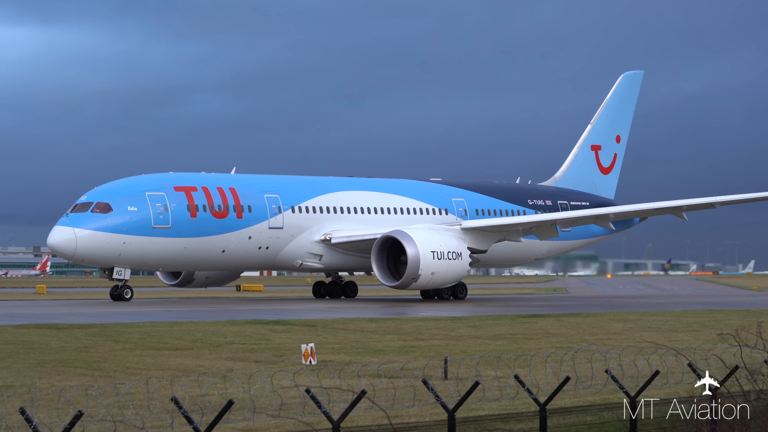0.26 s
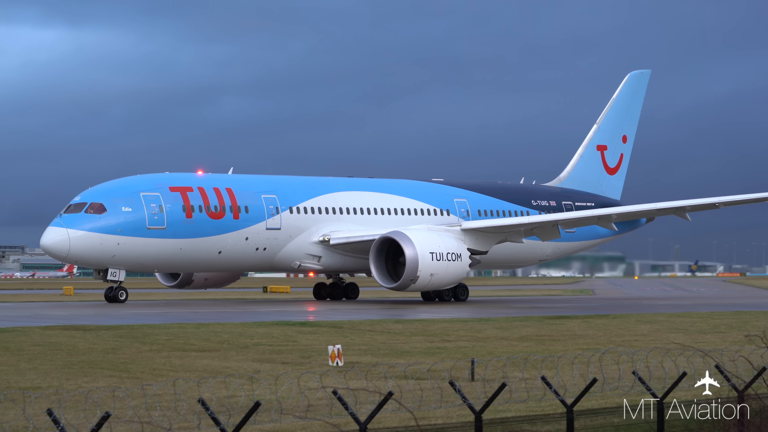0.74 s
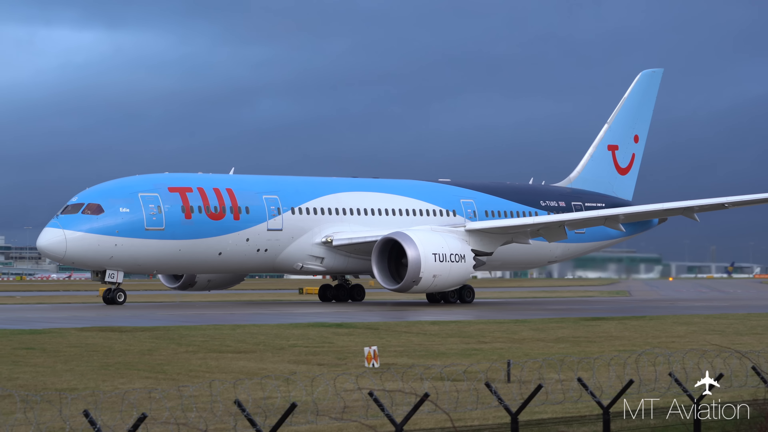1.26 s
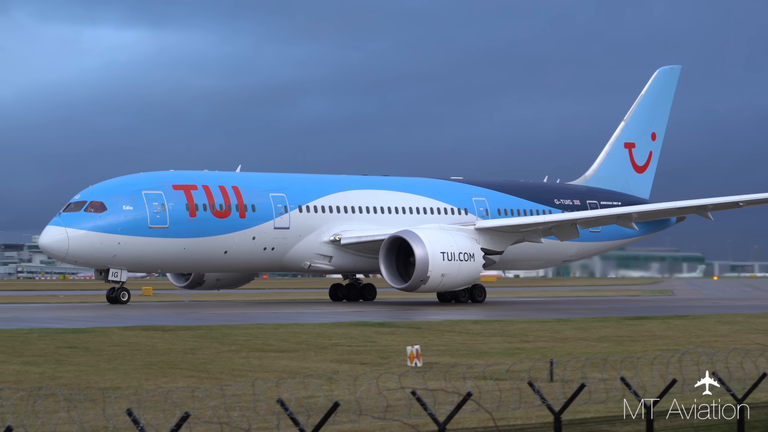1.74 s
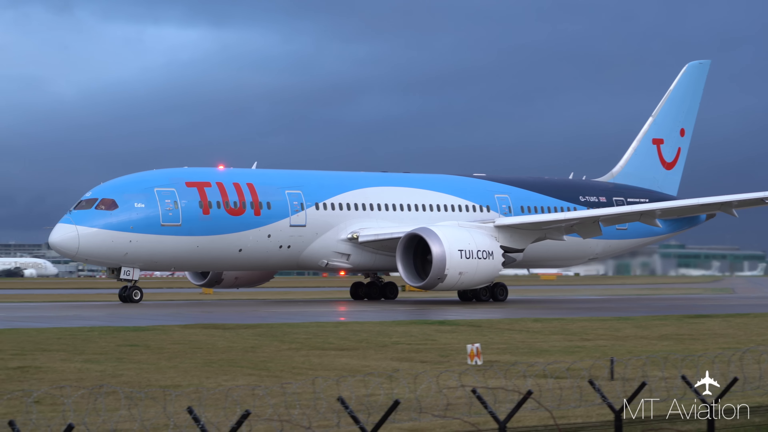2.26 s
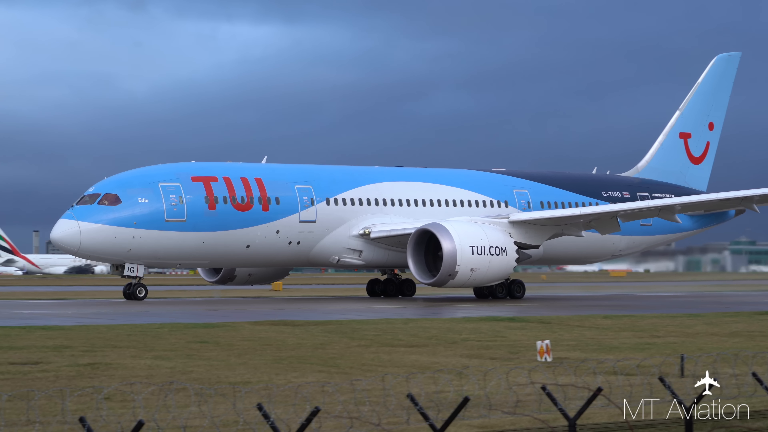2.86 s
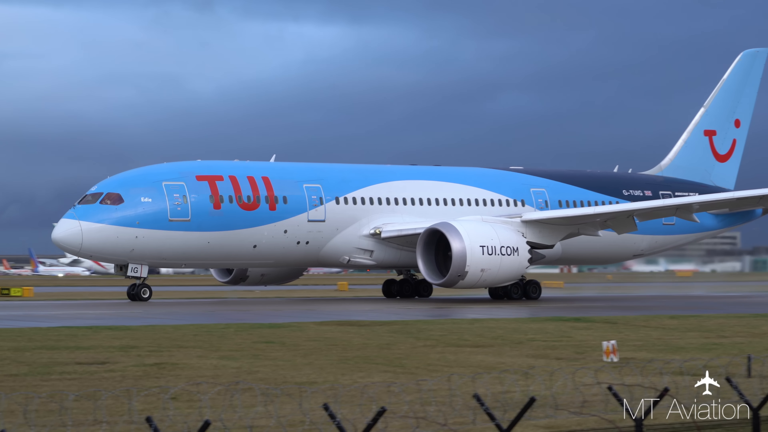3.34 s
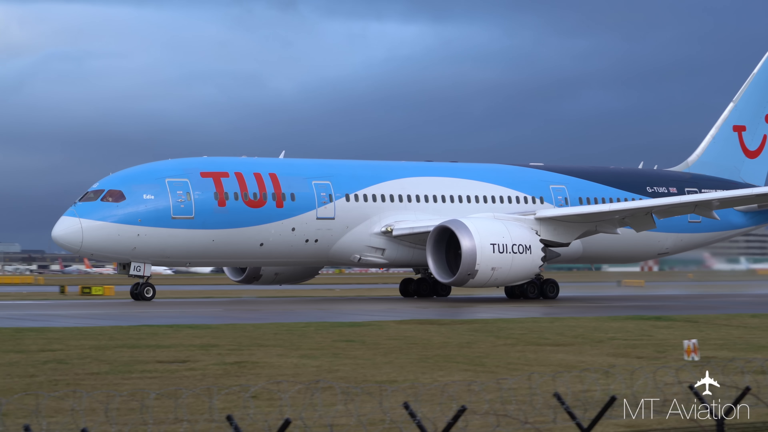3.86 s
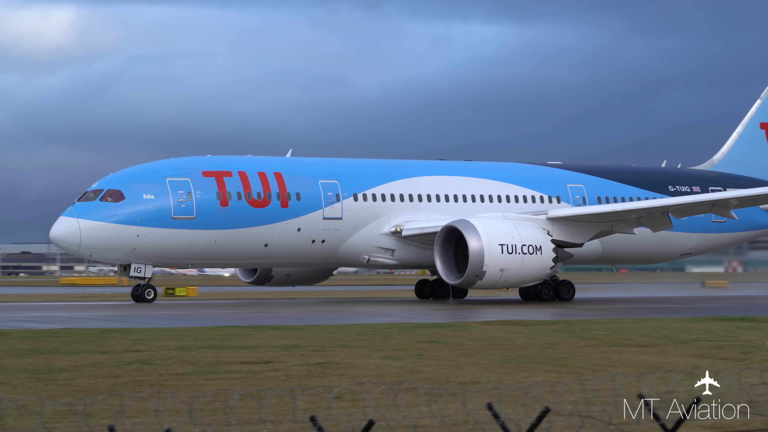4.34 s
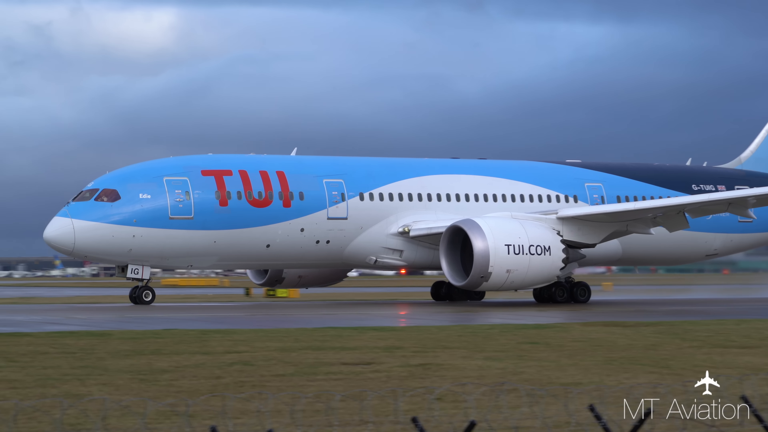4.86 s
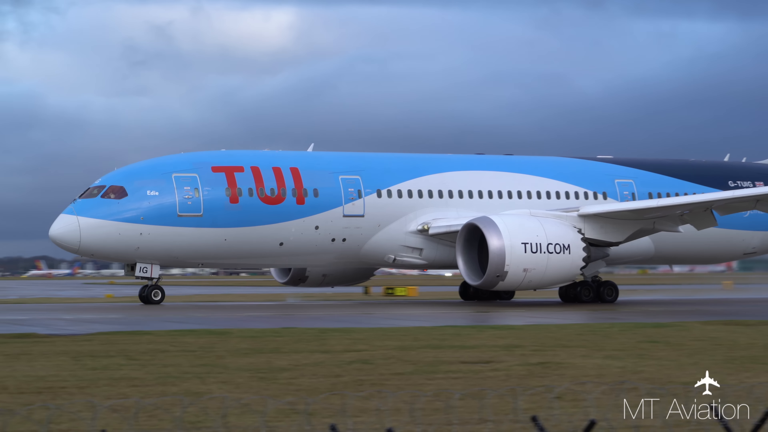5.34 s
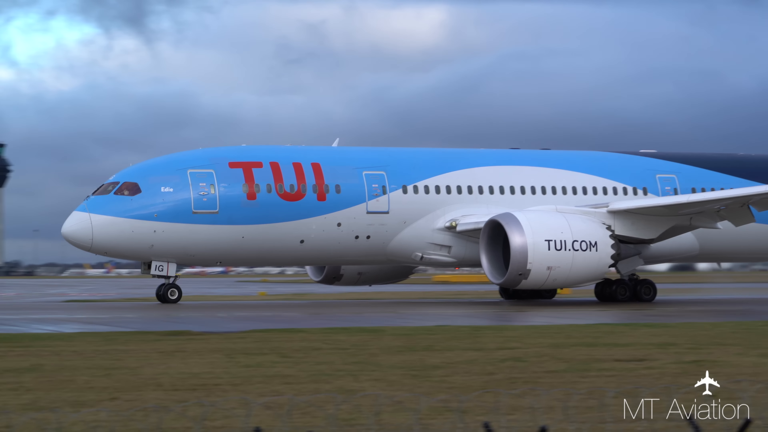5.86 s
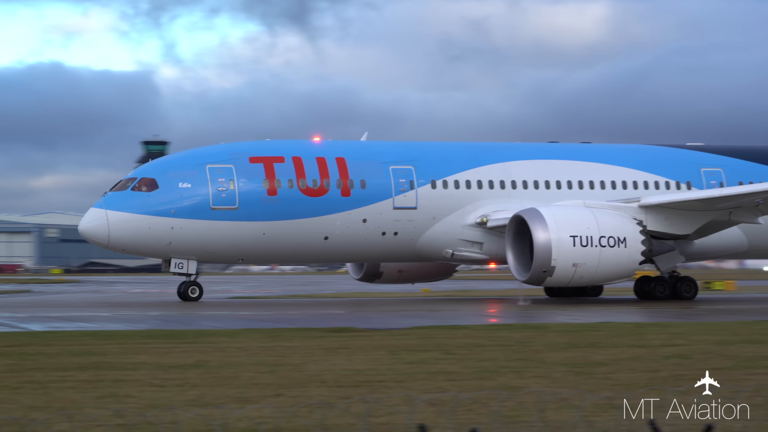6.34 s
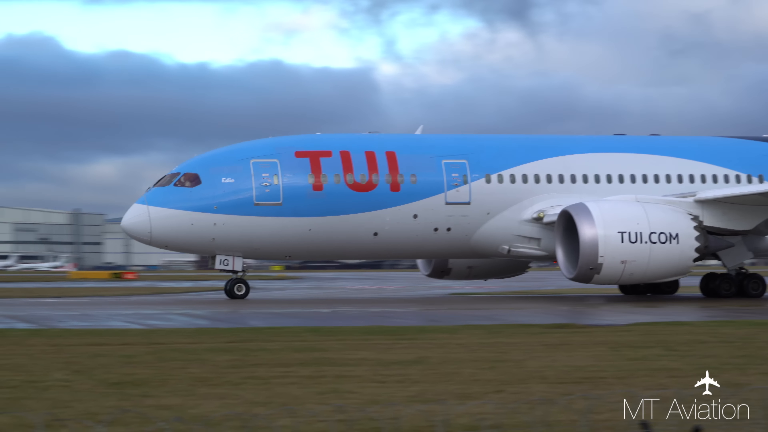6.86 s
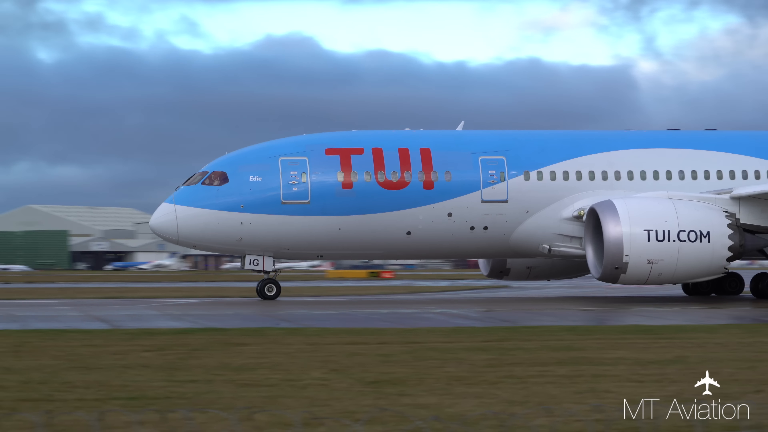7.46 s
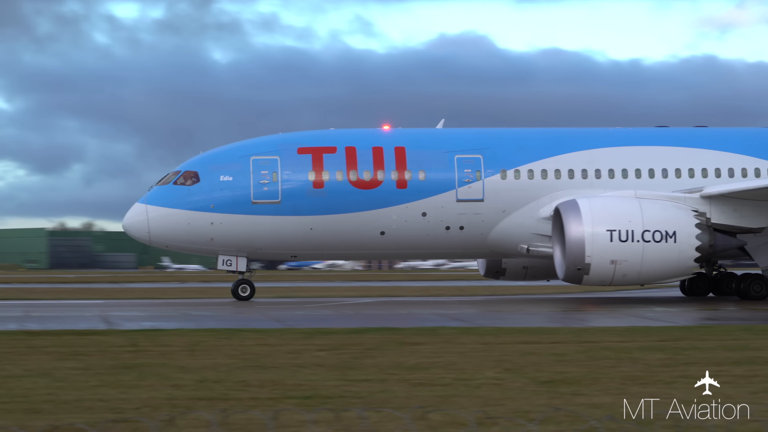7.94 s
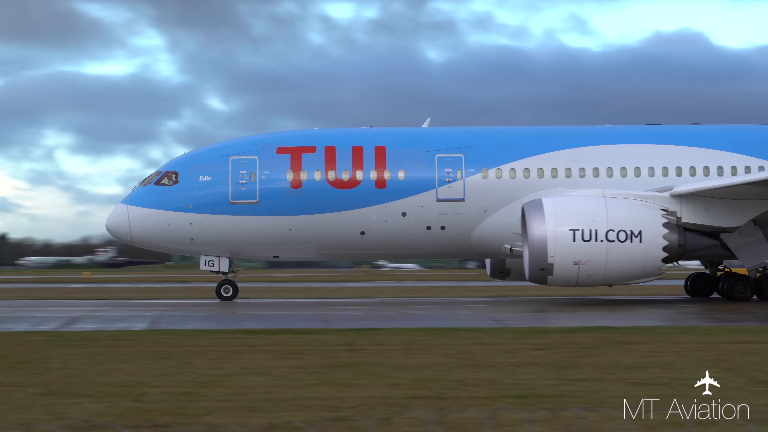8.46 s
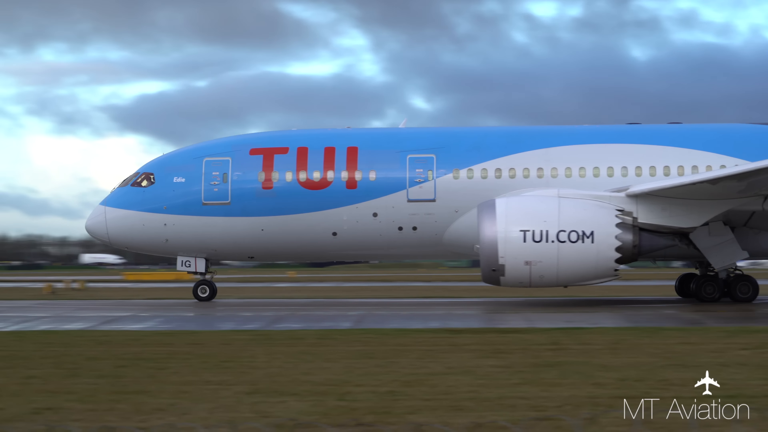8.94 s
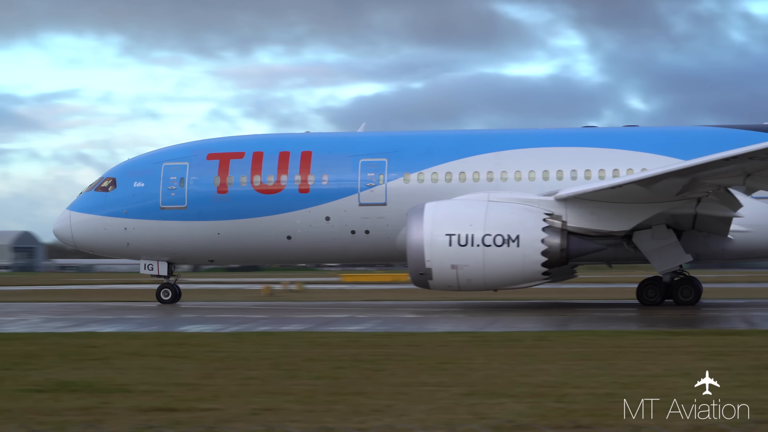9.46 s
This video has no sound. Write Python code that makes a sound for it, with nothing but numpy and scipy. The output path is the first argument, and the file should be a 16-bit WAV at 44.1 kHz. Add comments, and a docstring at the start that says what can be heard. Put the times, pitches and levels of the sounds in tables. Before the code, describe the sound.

A big twin-engine jet rolls past a stereo camera microphone outdoors beside a runway. From 0 s there is a strong, steady, airy hiss centred in the mids and treble, with thin wavering whistles around 3 to 5 kHz that mostly disappear by 2 s. From about 0.5 s a multi-toned fan whine emerges, climbing steeply between 1.2 and 3 s, roughly from 350 to 590 Hz at its base, buzzy and fluttering. Short dull wind buffets hit at 2.1 to 2.4 s. After 3 s the pitch rises only slightly, levelling near 690 Hz, while the upper harmonics drop out from 3.5 to 7 s. A low rumble strengthens after 3 s. From 6 to 9.7 s a fuller, coarser exhaust roar grows, leaning right, with the lowest tone faint beneath. Ground reflections give a slow hollow sweep; treble flickers throughout, and wind flutters again near 8.3 s. It ends still roaring.

```python
"""A twin-fan airliner spools up and rolls past a camera microphone beside the runway.
Inlet hiss (shaped noise) and core whistles (wavering sines) come first; blade-rate harmonics then
emerge and climb, with wind buffets about two seconds in, and fade out one by one. Later the exhaust
roar (shaped noise) grows as the engines come abeam. Throughout, the ground echo combs the noise with
moving dips, turbulent air makes the sound flicker, and wind flutters on the microphone ports."""
import sys
import numpy as np
from scipy import signal
from scipy.fft import rfft, irfft, next_fast_len
from scipy.io import wavfile
from scipy.ndimage import map_coordinates

SR = 44100
rng = np.random.default_rng(int(sys.argv[2]) if len(sys.argv) > 2 else 0)


def dump(signal):
    """Clip the signal to [-1, 1] and save it as 16-bit WAV at the path in sys.argv[1]."""
    limited = np.clip(np.atleast_2d(signal).T, -1, 1)
    pcm = np.round(limited * 32767).astype(np.int16)
    wavfile.write(sys.argv[1], SR, pcm)


N = 428211
T = np.arange(N) / SR

# fan blade-passing rate: t/s, f/Hz
BLADE_RATE = [(0, 325), (.6, 335), (1.2, 354), (1.6, 402), (2, 462), (2.4, 522), (2.8, 570), (3, 590),
              (3.3, 608), (3.9, 643), (4.5, 667), (5.2, 679), (6, 689), (6.8, 694), (9.71, 696)]


def undb(db):
    """Amplitude ratio of a level in decibels."""
    return 10 ** (np.asarray(db) / 20)


def curves(table):
    """Linear interpolation in time of each column of a table."""
    s, *columns = np.transpose(table)
    return [np.interp(T, s, c) for c in columns]


def at(table, hz, order=1):
    """Linear interpolation of one column on a log-frequency axis."""
    rows = np.array(table, float)
    return np.interp(np.log(hz), np.log(rows[:, 0]), rows[:, order])


def walk(rate):
    """Slow random modulation: normal levels, rate per second, joined by cubic splines; spread near 1."""
    coarse = np.arange(0, T[-1] + .01, .002)
    steps = rng.standard_normal(int(coarse[-1] * rate) + 2)
    return np.interp(T, coarse, map_coordinates(steps, [coarse * rate], order=3))


def bump(s, length_s):
    """Raised-cosine envelope around s; length_s is its full width at half height."""
    out = np.zeros(N)
    near = slice(max(int((s - length_s) * SR), 0), int((s + length_s) * SR))
    out[near] = np.cos(np.pi / 2 * (T[near] - s) / length_s) ** 2
    return out


def late(x, lag_s):
    """Propagation delay: x heard lag_s later, by interpolation between samples."""
    return map_coordinates(x, [np.arange(N) - lag_s * SR], order=3, mode="mirror")


def band(x, lo_hz, hi_hz):
    """Band-pass filtering of x, normalised to unit rms."""
    y = signal.sosfilt(signal.butter(3, [lo_hz, hi_hz], "band", fs=SR, output="sos"), x)
    return y / np.sqrt(np.mean(y ** 2))


def inlet_hiss(level_db):
    """Broadband noise of the inlets: a fixed spectral density under a level curve."""
    # inlet hiss spectrum: f/Hz, relative density/dB per Hz
    hiss_shape = [(120, -47), (250, -22), (400, -13.5), (600, -7), (900, -3.5), (1300, -0.5), (1900, -1),
                  (2750, -1), (3800, -4.5), (5200, -7.5), (6900, -18), (9000, -27.5), (11500, -55),
                  (16000, -95)]
    # level of the whole inlet hiss relative to the level curve
    offset_db = -0.4
    return hiss_shape, undb(level_db + offset_db), 1


def exhaust_roar(level_db):
    """Exhaust noise: a fixed spectral density under a level curve."""
    # exhaust roar spectrum: f/Hz, relative density/dB per Hz
    roar_shape = [(60, -55), (120, -42), (200, -8), (300, -6), (450, 4), (700, 3.5), (1100, 1.5),
                  (2000, -2), (4000, -35), (9000, -70), (16000, -100)]
    # level of the whole exhaust roar relative to the level curve
    offset_db = 11.5
    return roar_shape, undb(level_db + offset_db), 1


def rumble(level_db):
    """Low-frequency noise whose spectrum slides down in frequency as thrust builds."""
    # rumble spectrum at full blade rate: f/Hz, relative density/dB per Hz
    rumble_shape = [(13, -58), (22, -40), (68, -7), (107, -0.5), (140, 0.5), (177, -9.5), (200, -19),
                    (260, -42), (440, -120)]
    # level of the whole rumble relative to the level curve
    offset_db = 0.5
    blade_hz = curves(BLADE_RATE)[0]
    # the exponent sets how much higher the rumble sits while the fans turn slowly
    deepen = (blade_hz / blade_hz.max()) ** 0.26
    return rumble_shape, undb(level_db + offset_db), deepen


def top_hiss(level_db):
    """High-frequency noise under air absorption: with less air in between, it reaches higher."""
    # top hiss spectrum before sliding: f/Hz, relative density/dB per Hz
    air_shape = [(2500, -60), (4500, -10), (6000, 4), (8900, -1), (10500, -11.5), (12000, -18.5),
                 (13700, -27), (15000, -26), (16000, -50)]
    # level of the whole top hiss relative to the level curve
    offset_db = 9.5
    # a falling lookup factor moves the spectrum up in frequency
    reach = np.interp(T, [0, T[-1]], [1.06, .92])
    return air_shape, undb(level_db + offset_db), reach


def engine_noise(sources):
    """Incoherent sources add in power, here in overlapping quarter-octave bands of flickering noise."""
    # brief treble swells and dips, scaled below by frequency: t/s, length/s, level at 7 kHz/dB
    treble_bumps = [(.97, 0.049, -1.5), (1.35, 0.26, -2), (1.57, 0.14, 2), (2.744, 0.64, 1.5),
                    (3.09, 0.11, -2.5), (3.25, 0.15, 3.5), (3.4, 0.11, -2), (3.52, 0.19, 3), (4.1, 0.34, 1),
                    (4.79, 0.12, -1.5), (4.99, .12, 2), (5.19, 0.073, -1.5), (5.462, 0.09, 1.5),
                    (6.13, .06, -1), (6.193, .1, 2), (7.03, 0.072, -2), (7.3, .3, 0.5), (7.842, 0.13, 0),
                    (8.933, 0.069, -2.5), (9.08, 0.086, 0), (9.57, .08, 2)]
    size = next_fast_len(N)
    f = np.maximum(np.fft.rfftfreq(size, 1 / SR), 1)
    centres = 22 * 2 ** np.arange(0, 9.6, .25)
    # density times centre frequency, summed, gives the power to divide out of each shape
    norm = [np.sqrt(np.sum(undb(at(shape, centres)) ** 2 * centres)) for shape, *_ in sources]
    noise = rfft(rng.standard_normal((2, size)))
    treble_db = sum(db * bump(s, length) for s, length, db in treble_bumps) + 0.57 * walk(9)
    quick = walk(28)
    for hz in centres:
        bell = np.cos(np.pi / 2 * np.clip(4 * np.log2(f / hz), -1, 1)) ** 2
        noise_band = irfft(noise * bell, size)[:, :N]
        power = sum((undb(at(shape, hz * slide)) * gain / n) ** 2
                    for (shape, gain, slide), n in zip(sources, norm))
        # flicker deepens with frequency
        depth = min(hz / 7000, 1.3) ** 1.13
        flicker_db = depth * (treble_db + 0.76 * quick + 0.84 * walk(18)) + 0.58 * walk(7)
        # .17: width of a quarter octave over its centre frequency
        yield hz, noise_band * np.sqrt(power * SR / 2 / .17) * undb(flicker_db)


def blade_tones():
    """Harmonics of the blade-passing rate; turbulent air modulates each one's amplitude and phase alone."""
    # harmonics before flutter: multiple, full from t/s, fades from t/s, rms level while held/dB
    multiples = [(1, 1.95, 9.2, -33.5), (2, 1.45, 7, -33.5), (3, 1.14, 6.6, -34), (4, .4, 6, -37),
                 (5, 1.1, 4.7, -39), (6, 1.1, 4.4, -37), (7, 2.1, 4.4, -39), (8, 2.3, 3.3, -40),
                 (9, 2.3, 3.9, -42.5), (10, 2.3, 3.9, -48), (11, 2.3, 3.9, -52), (12, 2.6, 3.9, -48),
                 (13, 2.3, 3.9, -51)]
    # swells of single harmonics before flutter: multiple, t/s, length/s, rms level at the top/dB
    tone_swells = [(1, 2.105, 0.12, -24.5), (1, 2.644, 0.21, -22.5), (1, 2.987, 0.32, -18.5),
                   (1, 3.4, 0.34, -25.5), (1, 3.65, .2, -28), (1, 3.87, .15, -24), (1, 4.07, 0.23, -23),
                   (1, 4.5, 0.17, -23), (1, 4.9, .2, -31), (1, 5.37, 0.16, -28), (1, 6.1, 0.21, -27.5),
                   (1, 6.7, .3, -27.5), (1, 7.0, .15, -25), (1, 7.7, 0.33, -29), (1, 9.2, 0.27, -30),
                   (2, 1.03, 0.36, -31), (2, 2.25, 0.23, -27), (2, 2.64, 0.47, -26), (2, 3.3, 0.32, -24.5),
                   (2, 3.6, 0.095, -22), (2, 4.31, .3, -28), (2, 4.65, .3, -28), (2, 5.2, 0.45, -26),
                   (2, 5.85, .2, -32), (2, 6.5, 0.19, -24.5), (2, 6.8, 0.28, -25), (3, 1.84, 0.38, -27),
                   (3, 2.36, .5, -26), (3, 3.25, .15, -28), (3, 3.5, 0.13, -26), (3, 3.85, .3, -29),
                   (3, 4.4, .15, -28), (3, 4.86, .25, -22), (3, 5.6, .35, -29), (3, 6.4, 0.42, -29),
                   (4, 1.2, 0.44, -29), (4, 2.0, .4, -29), (4, 3.87, 0.43, -30), (4, 6.5, .15, -32),
                   (4, 5.65, .25, -36), (5, 1.4, .4, -29), (5, 3.02, .3, -32), (6, 2.27, 0.44, -26.5),
                   (6, 2.88, .3, -32), (7, 2.32, .25, -33), (7, 2.7, .45, -29), (8, 2.58, 0.25, -30.5),
                   (8, 2.84, 0.33, -28), (8, 3.2, .2, -35), (9, 2.7, .5, -37), (12, 2.8, .5, -41)]
    emerge_db_s, fade_db_s = 50, 40
    lead_s, leading_from = .06, 5  # one fan runs ahead; multiples from the fifth up are heard from it
    hz = curves(BLADE_RATE)[0]
    ahead_hz = np.interp(T + lead_s, T, hz)
    phases = 2 * np.pi * np.cumsum([hz, ahead_hz], axis=1) / SR
    out = []
    for k, start, end, db in multiples:
        k = round(k)
        ramp_db = np.minimum(0, np.minimum(emerge_db_s * (T - start), fade_db_s * (end - T)))
        held = undb(db + ramp_db + 1.6 * walk(8))
        swell = sum(undb(top_db) * bump(s, length)
                    for m, s, length, top_db in tone_swells if round(m) == k)
        waver = 0.71 * k ** 0.19 * walk(30) + 0.33 * walk(90)  # rad
        wave = np.sin(k * phases[int(k >= leading_from)] + waver)
        out.append((k * hz.mean(), np.sqrt(2) * np.hypot(held, swell) * undb(3.1 * walk(30)) * wave))
    return out


def core_whistles():
    """Sinusoids of fixed nominal frequency; turbulent air modulates each one's amplitude and phase."""
    # core whistles before wavering: start t/s, end t/s, f/Hz, rms level at the middle/dB
    whistle_rows = [(0, .9, 2700, -31), (.7, 1.5, 2790, -31), (0, .8, 3410, -37), (0, 0.698, 3730, -34),
                    (0, .8, 4300, -36), (.2, 1.1, 4870, -38), (1.302, 1.9, 5400, -37),
                    (4.1, 5.006, 1624, -38), (4.4, 5.0, 4600, -39), (.1, .6, 6720, -47),
                    (1.2, 1.8, 6720, -41), (1.5, 2.1, 7250, -40)]
    out = []
    for start, end, hz, db in whistle_rows:
        progress = np.clip((T - start) / (end - start), 0, 1)
        arch = np.sqrt(np.clip(np.sin(np.pi * progress), 0, 1))
        wave = np.sin(2 * np.pi * hz * T + 1.9 * walk(25))
        out.append((hz, np.sqrt(2) * undb(db + 2.57 * walk(11)) * arch * wave))
    return out


def ground(x):
    """Comb interference: x plus its echo from grass and asphalt, which keeps only its low part in step."""
    # echo delay, growing overall as the engines come near: t/s, lag/ms
    echo_lag = [(0, 1.43), (1.7, 1.47), (2.4, 1.744), (4.5, 1.69), (5.6, 1.85), (6.5, 2.11), (8, 2.23),
                (9.71, 2.41)]
    lag_ms = curves(echo_lag)[0]
    echo = signal.sosfilt(signal.butter(2, 1500, fs=SR, output="sos"), x)
    return x + .36 * np.array([late(e, lag_ms / 1000) for e in echo])


def wind():
    """Turbulent pressure at the ports: eddies flutter at each one alone, a few stronger ones thump."""
    # gusts before flutter: t/s, length/s, level at the top/dB
    gust_rows = [(.2, 0.36, -46), (.47, 0.28, -43), (1.35, .3, -56), (1.85, .4, -51.5), (2.1, .08, -41.5),
                 (2.22, 0.091, -41), (2.36, 0.073, -52), (3.05, .35, -51), (3.8, .35, -51), (6.0, .2, -53),
                 (7.2, .3, -49), (7.55, .3, -49), (7.9, .4, -46), (8.33, .35, -41), (8.8, .4, -53),
                 (9.15, .15, -44), (9.63, .2, -43)]
    # single buffets: t/s, f/Hz, length/ms, level at the top/dB
    buffet_rows = [(2.075, 380, 18, -31.5), (2.11, 420, 20, -27), (2.215, 520, 41, -22),
                   (2.27, 380, 16, -31), (2.38, 250, 13, -32)]
    breeze_db = -63.5  # between gusts, before flutter
    noise = rng.standard_normal((2, N))
    breeze = undb(breeze_db + 3.0 * walk(4))
    blow = breeze + sum(undb(db) * bump(s, length) for s, length, db in gust_rows)
    flutter_db = -2.0 + 6.2 * np.array([walk(30), walk(30)])
    out = band(noise, 155, 430) * blow * undb(flutter_db)
    for s, hz, ms, db in buffet_rows:
        near = slice(int((s - .1) * SR), int((s + .1) * SR))
        # Gaussian with a standard deviation of 0.4 of the length
        puff = np.exp(-.5 * ((T[near] - s) / (ms / 2500)) ** 2)
        out[:, near] += undb(db) * puff * band(noise[::-1, near], hz / 1.47, hz * 1.46)
    return out


def scene():
    """Two-port reception: level, coherence and arrival time vary as the ports turn from the engines."""
    # the roll, level curves before each source's offset, flicker and echo: t/s, inlet hiss/dB,
    # exhaust roar/dB, rumble/dB, top hiss/dB, left minus right/dB
    roll = [(0.0, -16, -40, -51, -46, -2), (.7, -15.8, -39, -51.5, -44, -2),
            (1.4, -15, -39, -52.5, -41, -2), (2.1, -16, -41, -52, -41.5, -1.5),
            (2.9, -17.5, -42.5, -45.5, -42, -2), (4.2, -16.5, -39.5, -44, -44, -3),
            (5.6, -16, -38.5, -43, -42.5, -3), (6.8, -17, -35.5, -43.5, -43.5, -4.5),
            (8.0, -17.5, -34, -42.5, -43.5, -6), (9.71, -17, -34.5, -43, -42, -5)]
    # shading of the far port by the camera body: f/Hz, share of the level difference
    shade = [(100, 0.01), (400, 0.21), (800, 0.77), (1500, 0.98), (3000, 1.34), (5000, 1), (8000, 1.98),
             (11000, 0.74), (15000, 0.92)]
    # sound unlike in the two ports: f/Hz, level facing the engines/dB, increase per dB of shading/dB
    unlike_sound = [(30, -34, .1), (70, -35, -2), (140, -37, -6), (350, -38, 4.5), (650, -17.5, -0.5),
                    (1400, -13.5, -0.5), (3080, -14, 1.55), (7040, -13, 1.8), (15000, -24, 5)]
    inlet_pan_db = -1  # the tones lie a little to the right of the rest
    hiss_db, roar_db, rumble_db, air_db, pan_db = curves(roll)
    sources = [inlet_hiss(hiss_db), exhaust_roar(roar_db), rumble(rumble_db), top_hiss(air_db)]
    sign = np.array([[1], [-1]])  # left, right
    noise, whine = 0, 0
    for hz, (mid, other) in engine_noise(sources):
        unlike = undb(at(unlike_sound, hz) - at(unlike_sound, hz, order=2) * (pan_db + 0.5))
        # mid is common to both ports, other has opposite sign in them
        ports = (mid + sign * unlike * other) / np.sqrt(1 + unlike ** 2)
        noise = noise + ports * undb(sign * at(shade, hz) * pan_db / 2)
    for hz, tone in blade_tones() + core_whistles():
        whine = whine + tone * undb(sign * (at(shade, hz) * pan_db + inlet_pan_db) / 2)
    left, right = ground(noise) + whine
    # the shaded port is also the further one: left lags once shading passes 3 dB
    return np.array([late(left, -1.1e-5 * (pan_db + 3.0)), right]) + wind()


def record(dry):
    """Saturation and band limiting: the camera rounds the highest peaks and cuts the top."""
    top_hz = 15719
    low_pass = signal.ellip(14, .2, 80, top_hz, fs=SR, output="sos")
    return signal.sosfilt(low_pass, np.tanh(0.59 * dry) / 0.6)


dry = scene()
out = record(dry)
dump(out)
```